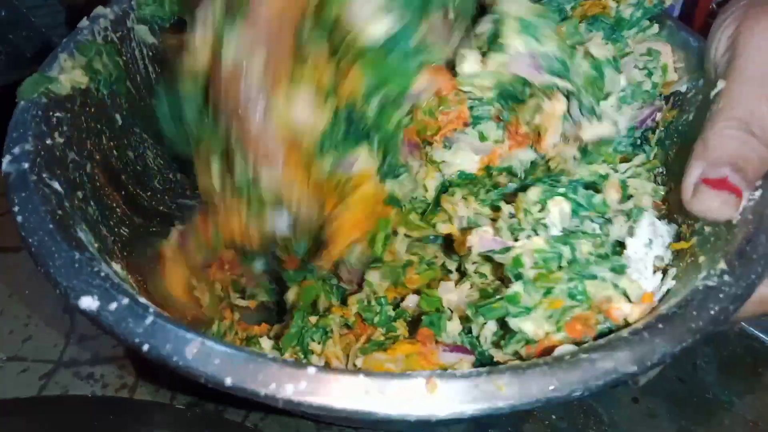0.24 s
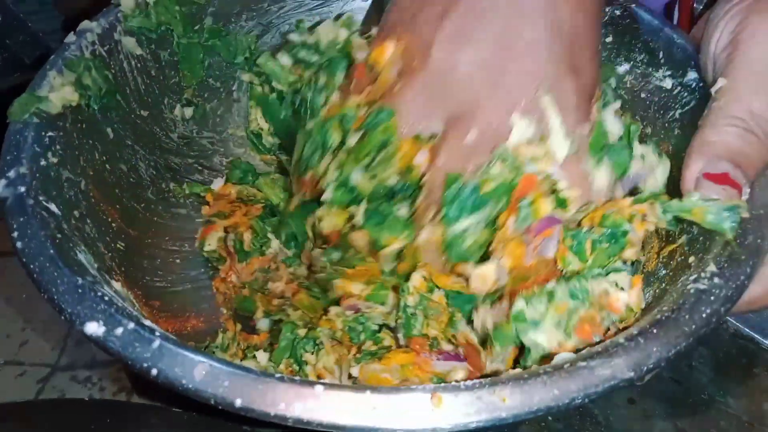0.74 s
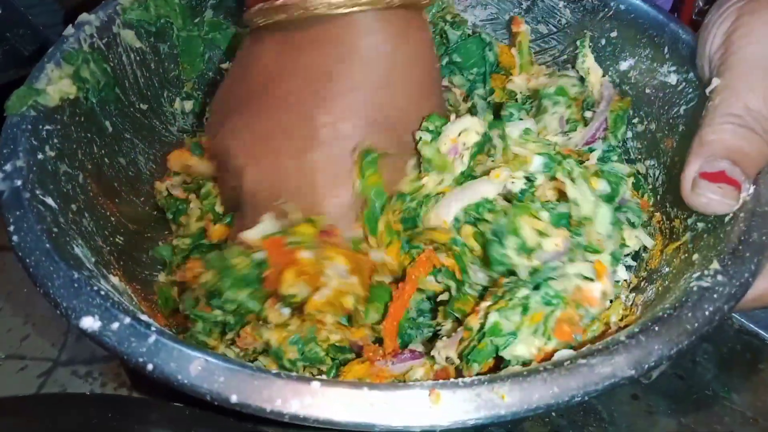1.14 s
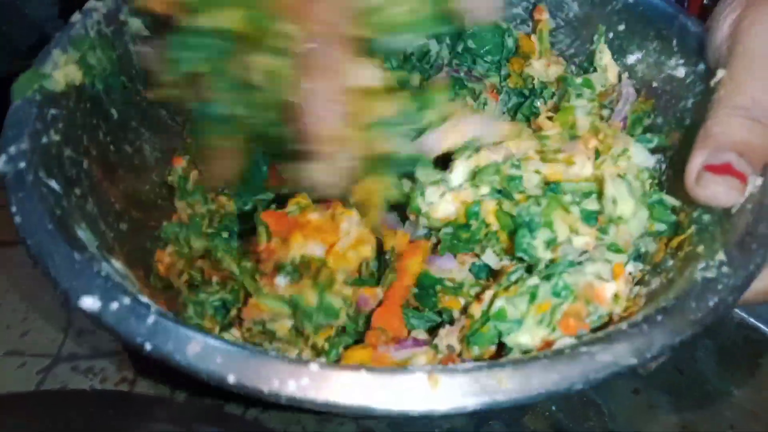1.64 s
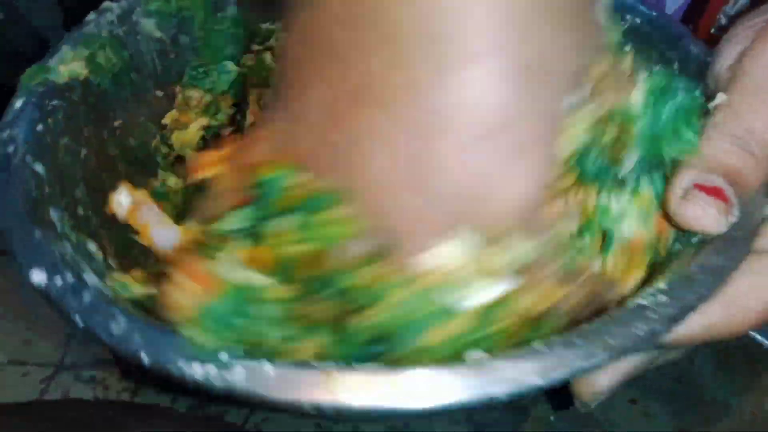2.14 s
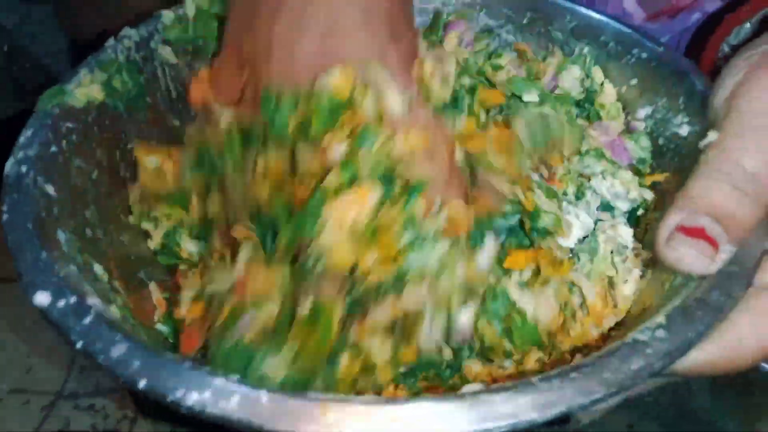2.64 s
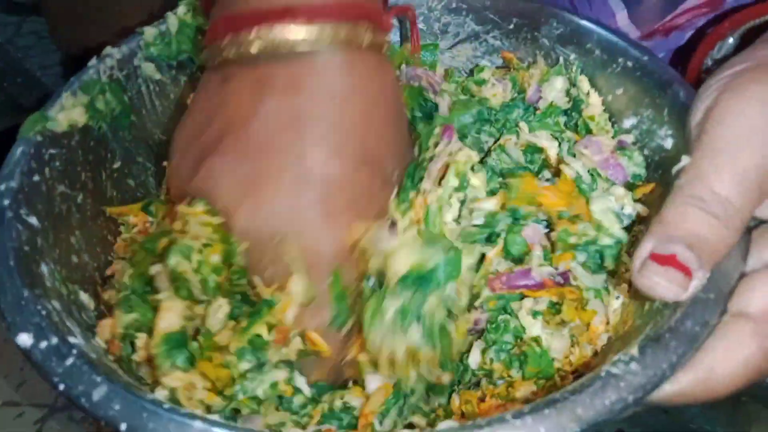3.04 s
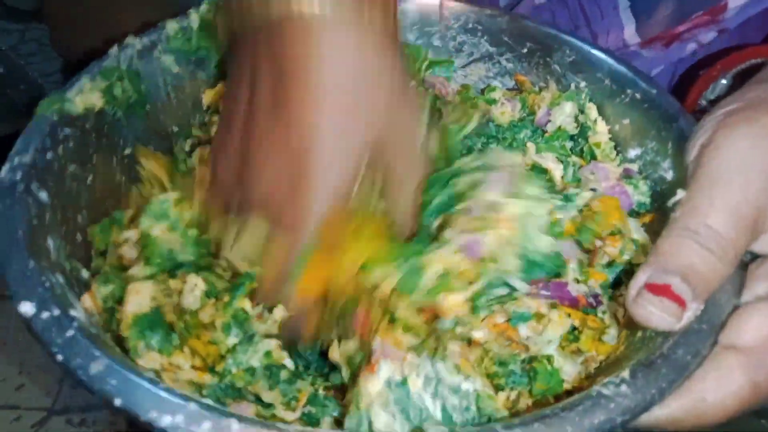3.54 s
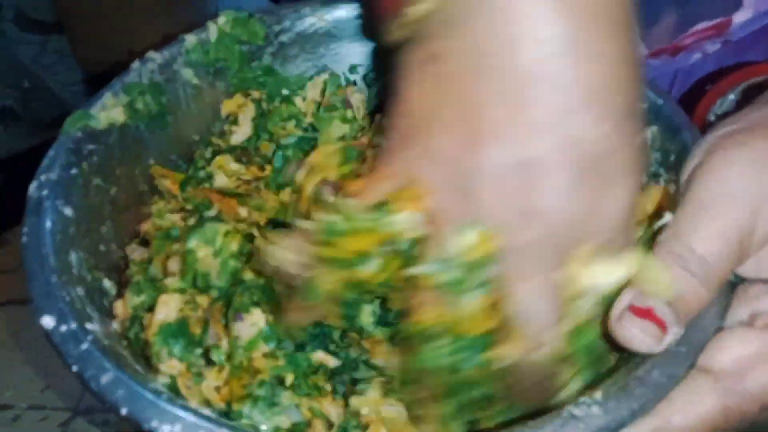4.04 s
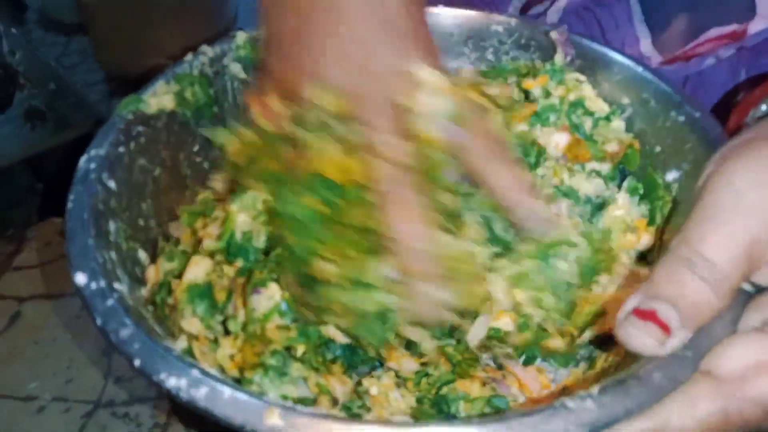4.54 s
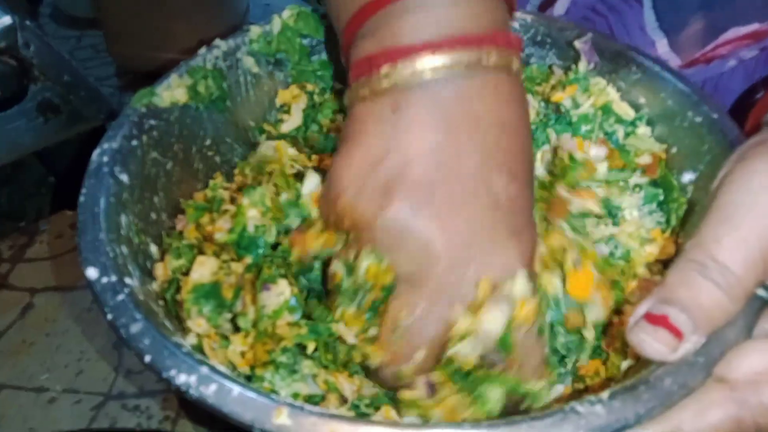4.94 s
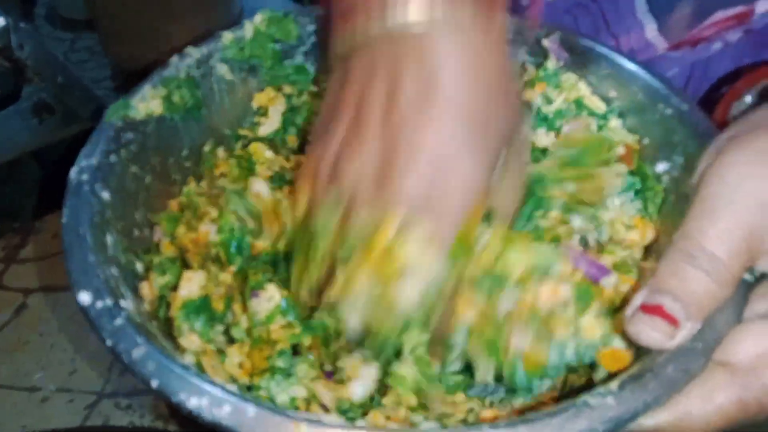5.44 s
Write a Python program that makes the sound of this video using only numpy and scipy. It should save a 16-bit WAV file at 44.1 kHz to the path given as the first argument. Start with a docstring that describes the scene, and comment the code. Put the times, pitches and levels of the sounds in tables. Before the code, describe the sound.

A hand kneads moist chopped vegetables in a steel bowl, with close squelches, crunches and dull knocks.

```python
"""A hand kneads moist chopped vegetables and rice in a steel bowl in a small kitchen.
Under each squeeze, clumps of tiny sticky breaks make the mix squelch, crunch and fizz, and air pockets pop.
Stalks snap, lumps plop, leaves swish, and the loaded bowl rocks and knocks on the floor, its steel damped.
A close, nearly mono microphone with a limiter picks it up."""
import sys
import numpy as np
from scipy import signal
from scipy.fft import rfft, irfft, next_fast_len
from scipy.io import wavfile
from scipy.ndimage import uniform_filter1d, minimum_filter1d, map_coordinates

SR = 44100
rng = np.random.default_rng(int(sys.argv[2]) if len(sys.argv) > 2 else 0)


def dump(signal):
    """Clip the signal to [-1, 1] and save it as 16-bit WAV at the path in sys.argv[1]."""
    limited = np.clip(np.atleast_2d(signal).T, -1, 1)
    pcm = np.round(limited * 32767).astype(np.int16)
    wavfile.write(sys.argv[1], SR, pcm)


N = 250929


def from_db(db):
    """Decibels to gain."""
    return 10 ** (np.asarray(db) / 20)


def rms_one(x):
    """Scale to unit power."""
    return x / np.sqrt(np.mean(x ** 2) + 1e-20)


def add(track, start_s, sound):
    """Mix a sound into a track."""
    i = max(0, int(start_s * SR))
    track[i:i + len(sound)] += sound[:N - i]


def butter(x, hz, kind, order=2):
    """Causal Butterworth filter."""
    return signal.sosfilt(signal.butter(order, hz, kind, fs=SR, output="sos"), x)


def drift(per_s):
    """A random wandering curve of unit power."""
    knots = rng.standard_normal(4000)
    return rms_one(np.interp(np.arange(N) * per_s / SR, np.arange(len(knots)), knots))


def dying_noise(t60):
    """Half a second of decaying noise with unit energy."""
    t = np.arange(SR // 2) / SR
    tail = rng.standard_normal(len(t)) * from_db(-60 * t / t60)
    return tail / np.linalg.norm(tail)


def coloured(x, spectrum):
    """Shape a sound with a minimum-phase EQ curve; unit power."""
    size = next_fast_len(N + 4096, real=True)
    hz, db = np.transpose(spectrum)
    gain_db = np.interp(np.log(np.fft.rfftfreq(size, 1 / SR) + 1), np.log(hz), db)
    cepstrum = irfft(np.log(from_db(gain_db)), size)
    response = np.exp(rfft(2 * cepstrum[:size // 2], size))
    return rms_one(irfft(rfft(x, size) * response, size)[:N])


def reverb(sound, bowl_db, bowl_t60, room_db, room_t60, delay_s):
    """The sound, then its scatter around the inside of the bowl and the kitchen's echo."""
    tail = from_db(bowl_db) * dying_noise(bowl_t60) + from_db(room_db) * dying_noise(room_t60)
    response = np.concatenate([[1], np.zeros(int(delay_s * SR)), tail])
    return signal.fftconvolve(sound, response)


def strokes(starts, holds, levels_db, rest_db):
    """Envelope in dB of a run of hand strokes: each builds, holds and eases off to the resting level."""
    grip_db_per_s, let_go_db_per_s = 280, 154
    t = np.arange(N) / SR
    power = from_db(rest_db) ** 2
    for start, hold, db in zip(starts, holds, levels_db):
        slack_db = np.maximum(grip_db_per_s * (start - t), let_go_db_per_s * (t - start - hold))
        power = power + from_db(db - np.clip(slack_db, 0, 100)) ** 2
    return 10 * np.log10(power)


def squeezing():
    """Squelch, crunch and fizz envelopes in dB: all swell with each squeeze, then the mix settles."""
    # the fingers close on a handful:
    # (start [s], hold [s], crunch [dB], paste relative to crunch [dB], wetness relative to crunch [dB])
    squeezes = [(0, .14, -42.5, -2.5, -12), (0.246, 0.077, -61.5, -8, 2), (0.639, 0.078, -45.5, 0.5, -10),
                (0.791, 0.035, -48, 1, -15), (0.958, 0.061, -37, 0, -7), (1.052, 0.16, -44, -4, -7.5),
                (1.358, 0.23, -50, -12, -6), (1.6, 0.011, -56, -7, 4), (1.859, 0.068, -41, 2.5, -5),
                (2.122, 0.17, -45, -1.5, -11), (2.362, 0.081, -48.5, 0, -14),
                (2.602, 0.078, -56.5, 1.5, 1.5), (2.835, 0.45, -43, -5.5, -8),
                (3.392, 0.24, -50.5, -4.5, -7), (3.736, 0.016, -59.5, 5.5, -6),
                (3.996, 0.14, -53, 0.5, -5.5), (4.331, 0.01, -52, 0.5, -10), (4.575, 0.083, -57.5, -3, 1.5),
                (4.816, 0.3, -41, -3.5, -6.5), (5.129, 0.17, -46.5, -2.5, -4), (5.487, 0.1, -56.5, -4.5, 6)]
    start, hold, crunch_db, paste_db, wet_db = np.transpose(squeezes)
    return (strokes(start, hold, crunch_db + paste_db, rest_db=-62),
            strokes(start, hold, crunch_db, rest_db=-61),
            strokes(start, hold, crunch_db + wet_db, rest_db=-62))


def shifting(x, depth_db, per_s, per_octave):
    """As the leaves shift, gaps open and close and each band swells on its own."""
    hz, times, frames = signal.stft(x, SR, nperseg=256)
    grid = np.meshgrid(per_octave * np.log2(1 + hz / 100), per_s * times, indexing="ij")
    patches = map_coordinates(rng.standard_normal((64, 1024)), grid, order=1, mode="wrap")
    return rms_one(signal.istft(frames * from_db(depth_db * patches), SR)[1][:N])


def grains(spectrum, envelope_db, base_per_s, rustle_db):
    """Tiny sticky breaks come in clumps, and more often the harder the hand presses."""
    press_db = envelope_db - np.median(envelope_db)
    rate = base_per_s * from_db(.3 * press_db + 4 * drift(45))
    sizes = from_db(4.5 * np.minimum(rng.exponential(1, N), 4.5)) * rng.choice([-1, 1], N)
    clicks = sizes * (rng.random(N) < rate / SR)
    clicks = reverb(clicks, bowl_db=0, bowl_t60=.025, room_db=-7, room_t60=.3, delay_s=.001)[:N]
    # under a light touch the leaves only slide, with a smooth rustle
    texture = rms_one(clicks) + from_db(rustle_db - .5 * press_db) * rng.standard_normal(N)
    texture /= np.sqrt(uniform_filter1d(texture ** 2, size=3000) + 1e-9)  # even out the loudness
    texture = shifting(texture, depth_db=2.2, per_s=60, per_octave=4)
    return from_db(envelope_db) * coloured(texture, spectrum)


def kneading(squelch_db, crunch_db, fizz_db):
    """Soft paste squelches, leaves crunch and the wet film fizzes."""
    # tone of the paste, the leaves and the film: (frequency [Hz], relative level [dB])
    squelch_eq = [(100, -56.5), (300, -17), (500, -14), (680, -4.5), (830, 0.5), (1020, -5), (1300, -5.5),
                  (1700, -24), (2600, -37), (5000, -50)]
    crunch_eq = [(500, -31.5), (1000, -5.5), (1500, 2), (1900, -0.5), (2500, -1), (3200, -7), (4200, -15.5),
                 (6000, -18), (12000, -66)]
    fizz_eq = [(1500, -8), (4000, -51), (5300, -14), (7000, 3), (8200, 7.5), (9800, -5), (11300, -4.5),
               (12700, -11), (15500, -7)]
    squelch = grains(squelch_eq, squelch_db, base_per_s=450, rustle_db=-5)
    crunch = grains(crunch_eq, crunch_db, base_per_s=900, rustle_db=0)
    fizz = grains(fizz_eq, fizz_db, base_per_s=1400, rustle_db=-1)
    return squelch + crunch + fizz


def air_pops(squelch_db, per_s, gain_db, t60):
    """Tiny air pockets burst at random, louder as the squeeze tightens."""
    track, t = np.zeros(N), np.arange(SR // 20) / SR
    for when, pitch, softness in rng.random((int(per_s * N / SR), 3)):
        hz = 650 * 5 ** pitch
        pop = np.sin(2 * np.pi * hz * t) * from_db(-60 * t / t60) * (1 - np.exp(-t * hz))
        add(track, when * N / SR, pop * from_db(squelch_db[int(when * N)] + gain_db - 2.9 * softness))
    return reverb(track, bowl_db=-10, bowl_t60=.06, room_db=4, room_t60=.12, delay_s=.00307)[:N]


def stalk_snaps(gain_db):
    """A breaking stalk gives a short crack, about half an octave wide."""
    # stalks snap and wet pockets burst: (time [s], relative peak [dB], pitch [Hz], t60 [s])
    snaps = [(.029, -30, 2900, 0.01), (.115, -29, 3460, 0.012), (.546, -34, 7560, 0.007),
             (0.874, -43.5, 7550, .028), (0.946, -14.5, 1820, 0.04), (.961, -17, 2050, 0.069),
             (1.012, -32, 7440, .01), (1.157, -30.5, 2800, 0.015), (1.84, -32.5, 8300, 0.049),
             (3.031, -30, 1720, .012), (3.552, -29.5, 7240, .022), (3.774, -47, 7460, .013),
             (4.467, -49.5, 8100, .06), (4.816, -23, 7140, 0.068), (4.858, -20, 2700, 0.038),
             (4.884, -25.5, 2640, 0.048), (5.027, -32, 2900, 0.015), (5.044, -26, 2740, 0.0058)]
    track = np.zeros(N)
    for start, peak_db, hz, t60 in snaps:
        crack = butter(dying_noise(t60), [hz / 1.2, hz * 1.2], "band")
        crack *= from_db(peak_db + gain_db) / np.abs(crack).max()
        crack = reverb(crack, bowl_db=-7, bowl_t60=.012, room_db=-5.5, room_t60=.23, delay_s=.002)
        add(track, start, crack)
    return track


def bowl_hits(hits, gain_db, uneven_db, hollow_db, hollow_t60, splash_db, splash_t60,
              contact_s, swell_cycles, low_cut_hz, space):
    """Each hit rings the bowl, most near the pitch of the hollow under the hand, and squirts a splash."""
    # modes of the steel bowl, damped by its load: (frequency [Hz], relative level [dB], t60 [s])
    bowl_modes = [(188, -2.5, 0.038), (286, -2, 0.034), (400, -1.5, 0.038), (491, 4.5, 0.018),
                  (682, 5, 0.016), (848, 9, 0.021), (998, 8, 0.0067), (1208, 9, 0.01), (1321, -7.5, 0.055),
                  (1494, 9.5, 0.0097), (1725, -4, 0.02), (2059, 8.5, 0.0094), (2220, 2, 0.03),
                  (2334, 4, 0.025), (2702, -4.5, 0.028), (2883, -2, 0.014), (3150, 6.5, 0.0041),
                  (3866, -4.5, 0.016)]
    # tone of the wet splash: (frequency [Hz], relative level [dB])
    splash_eq = [(1000, -24), (2500, 21), (4000, 5), (5200, 1), (7200, 5), (8600, 2), (10000, -14.5),
                 (11500, -9), (13000, -20), (15500, -21)]
    rings, splashes, t = np.zeros(N), np.zeros(N), np.arange(SR // 10) / SR
    attack = 1 - np.exp(-t / contact_s)  # the cushioned contact takes a moment to build up
    for start, hollow_hz, hit_db, slope_below, slope_above, wet_db in hits:
        hz, mode_db, t60 = np.transpose(bowl_modes + [(hollow_hz, hollow_db, hollow_t60)])
        t60 = np.minimum(t60, 26 / hz)  # the wet load stops every mode within 26 cycles
        octaves = np.log2(hz / hollow_hz)
        slope = np.where(octaves < 0, slope_below, slope_above)
        rolloff_db = slope * np.maximum(np.abs(octaves) - .1, 0)
        cushion_db = 16.5 * np.maximum(np.log2(hz / 2540), 0)  # the soft load dulls the highest modes
        strength = from_db(gain_db + hit_db + mode_db - rolloff_db - cushion_db)
        # each hit lands on another spot and favours other modes
        strength[:-1] *= from_db(uneven_db * (2 * rng.random(len(bowl_modes)) - 1))
        modes = np.sin(2 * np.pi * hz[:, None] * t) * from_db(-60 * t / t60[:, None])
        modes *= 1 - np.exp(-t * hz[:, None] / swell_cycles)  # the low modes swell more slowly
        polarity = (-1) ** np.arange(len(hz))
        ring = attack * ((strength * polarity) @ modes)
        splash = from_db(gain_db + splash_db + wet_db) * attack ** 2 * dying_noise(splash_t60)[:len(t)]
        add(rings, start, reverb(ring, **space, delay_s=.004))
        add(splashes, start, reverb(splash, **space, delay_s=.0054))
    return butter(rings, low_cut_hz, "high") + np.std(splashes) * coloured(splashes, splash_eq)


def lump_plops():
    """Lumps and fingers plop against the bowl and let the hollow ring."""
    # plops: (time [s], hollow pitch [Hz], relative level [dB], roll-off below the pitch [dB/octave],
    # roll-off above it [dB/octave], relative splash [dB])
    plops = [(.121, 760, -38.5, 12, 18, -57), (.3345, 738, -26.5, 15, 19, -64),
             (.4095, 734, -32.5, 8.6, 2.2, -40), (.5085, 767, -30, 21, 8, -39),
             (.5112, 1310, -28, 21, 14, -43), (.585, 1610, -28, 7.4, 11, -61),
             (.626, 1510, -35.5, 15, 9, -70), (.83, 733, -43, 11, 13, -65),
             (.984, 724, -26, 11.4, 2.6, -56), (1.854, 850, -27, 23, 25, -48),
             (1.872, 820, -17, 43, 16, -49), (1.898, 730, -30, 12, 4.2, -41.5),
             (2.349, 860, -27, 18, 30, -58), (2.532, 748, -32.5, 46, 14, -48.5),
             (2.603, 650, -46.5, 1.7, 15, -61), (2.864, 645, -26, 3, 9.9, -63),
             (2.888, 750, -26, 6.6, 13, -50), (2.9188, 876, -17.5, 16, 14, -35.5),
             (3.391, 770, -38.5, 4.6, 4.4, -50), (3.553, 830, -39.5, 21, 2.4, -41),
             (3.888, 830, -47, 6.1, 10, -60.5), (4.075, 810, -42, 7.9, 11, -60),
             (4.369, 737, -35.5, 33, 9.9, -48), (4.577, 720, -42.5, 19, 9.5, -53),
             (4.818, 930, -25.5, 20, 8, -35), (4.85, 786, -29, 23, 5.6, -31.5),
             (4.86, 2830, -21, 8.1, 8, -26.5), (4.9152, 732, -17, 18.6, 20, -34),
             (4.9353, 1650, -21.5, 5.5, 11, -24.5)]
    return bowl_hits(plops, gain_db=1, uneven_db=6.5, hollow_db=1.5, hollow_t60=.048,
                     splash_db=22.5, splash_t60=.026, contact_s=.0003, swell_cycles=.75, low_cut_hz=39,
                     space=dict(bowl_db=-4.5, bowl_t60=.086, room_db=-15, room_t60=.42))


def hand_rubs():
    """The heel of the hand rubs the bowl's wall: a faint low rumble swells with each stroke."""
    # strokes along the wall: (start [s], hold [s], level [dB])
    rubs = [(0.494, 0.23, -69), (1.847, 0.045, -52), (4.517, 0.13, -65.5), (5.46, 0.18, -66)]
    # tone of the rumble: (frequency [Hz], relative level [dB])
    rumble_eq = [(25, -39), (60, -19.5), (110, -1), (190, 0.5), (270, -1.5), (500, 0.5), (2000, -48)]
    envelope = from_db(strokes(*np.transpose(rubs), rest_db=-71))
    return butter(envelope * coloured(rng.standard_normal(N), rumble_eq), 45, "high")


def floor_knocks():
    """A push rocks the bowl against the floor; the hand, deep in the mix, damps the hollow at once."""
    # knocks: (time [s], hollow pitch [Hz], relative level [dB], roll-off below the pitch [dB/octave],
    # roll-off above it [dB/octave], relative splash [dB])
    knocks = [(.9055, 1650, -10, 16, 7, -21.5), (1.283, 810, -13, 25, 6, -28.5),
              (1.4472, 1850, -11, 13, 0, -29), (2.201, 900, -12.5, 19, -3, -24),
              (2.7275, 850, -26, 9.5, -1, -39), (3.2833, 1126, -23.5, 10, 8, -56),
              (3.5935, 1800, -12.5, 13, 6, -32), (3.6012, 1600, -13, 14, 5, -44),
              (4.663, 704, -18, 22, 6, -29.5), (5.2725, 860, -25.5, 12, 1, -49),
              (5.4088, 1600, -20.5, 13, -3, -32.5)]
    return bowl_hits(knocks, gain_db=12.5, uneven_db=4.5, hollow_db=-13.5, hollow_t60=.02,
                     splash_db=27.5, splash_t60=.023, contact_s=.00074, swell_cycles=.25, low_cut_hz=155,
                     space=dict(bowl_db=-5.5, bowl_t60=.099, room_db=-11, room_t60=.26))


def leaf_swishes():
    """A handful is scooped: sliding leaves swell and fade with no grain."""
    # scoops: (centre time [s], half length [s], level [dB])
    swishes = [(2.15, 0.11, -52), (2.436, 0.026, -49), (4.09, 0.15, -55), (4.36, 0.028, -48),
               (5.542, 0.026, -53)]
    # tone of sliding leaves: (frequency [Hz], relative level [dB])
    swish_eq = [(300, -6), (800, 1), (1300, -2), (2800, 12), (4500, -9), (6200, 4.5), (8000, 10),
                (9800, -7), (11400, -6), (13000, -16), (15500, -27)]
    t = np.arange(N) / SR
    envelope = sum(from_db(db) * np.exp(-.5 * ((t - centre) / half) ** 2) for centre, half, db in swishes)
    return envelope * coloured(rng.standard_normal(N), swish_eq)


def scene():
    """All sits in the middle; only the highest fizz and the knocks' splashes spread to the sides."""
    squelch_db, crunch_db, fizz_db = squeezing()
    knocks = floor_knocks()
    middle = knocks + lump_plops() + air_pops(squelch_db, per_s=22, gain_db=12, t60=.012)
    middle += stalk_snaps(gain_db=2.5) + kneading(squelch_db, crunch_db, fizz_db)
    middle += hand_rubs() + leaf_swishes()
    high_fizz = rms_one(butter(rng.standard_normal(N), [10500, 16000], "band", order=3))
    side = from_db(fizz_db - 16.5) * high_fizz
    # the splash glances off the rim and comes back from the side
    add(side, .0015, from_db(-10) * butter(knocks, [5300, 8000], "band", order=8))
    return np.array([middle + side, middle - side])


def limiter(x, ceiling_db, release_db_per_s, lookahead_s):
    """The gain ducks just before a peak and recovers steadily."""
    over_db = np.maximum(20 * np.log10(np.abs(x).max(axis=0) + 1e-9) - ceiling_db, 0)
    ramp = release_db_per_s * np.arange(N) / SR
    held_db = np.maximum.accumulate(over_db + ramp) - ramp
    reach = int(lookahead_s * SR)
    gain_db = minimum_filter1d(-held_db, 2 * reach)
    return x * from_db(uniform_filter1d(gain_db, reach // 2))


def record(dry):
    """Peaks are limited and the top is cut steeply at 16 kHz."""
    limited = limiter(dry, ceiling_db=-4, release_db_per_s=67.5, lookahead_s=.016)
    return signal.sosfilt(signal.ellip(10, .1, 80, 16000, fs=SR, output="sos"), limited)


dry = scene()
out = record(dry)
dump(out)
```